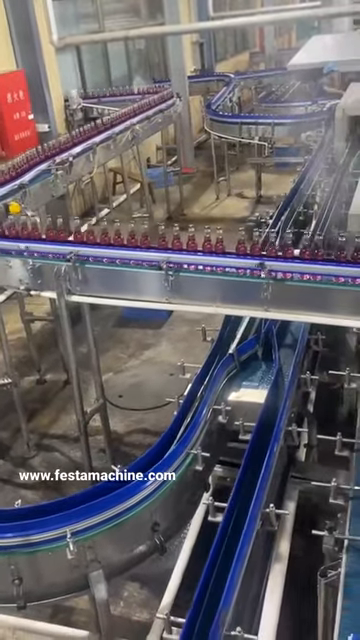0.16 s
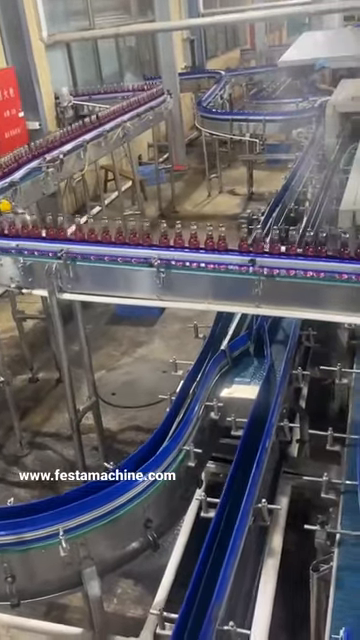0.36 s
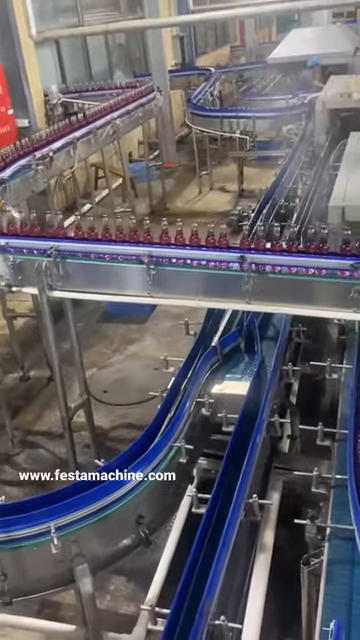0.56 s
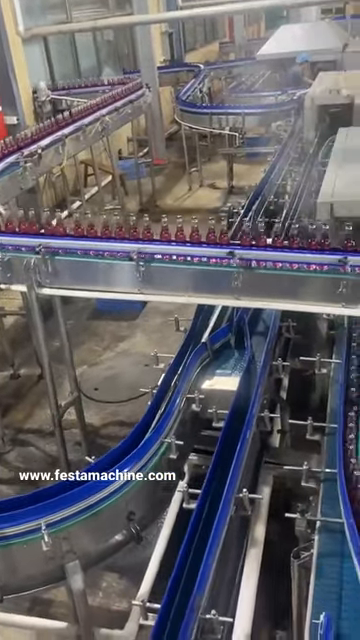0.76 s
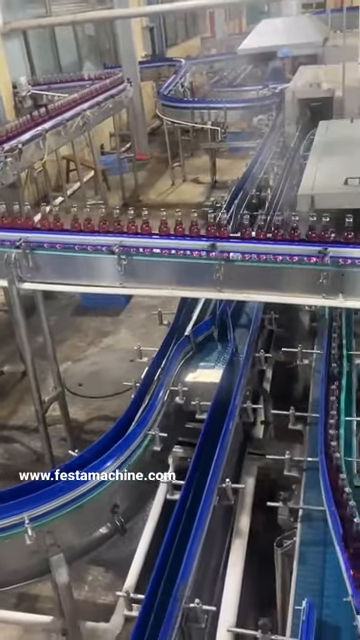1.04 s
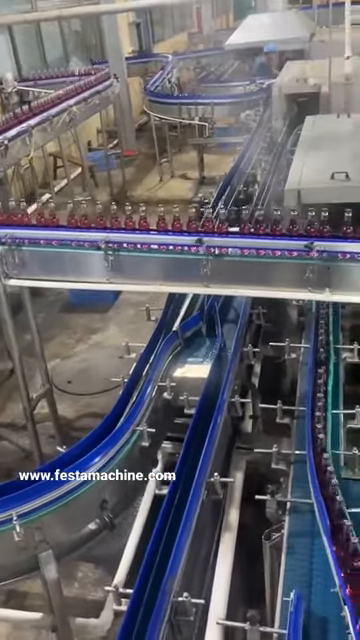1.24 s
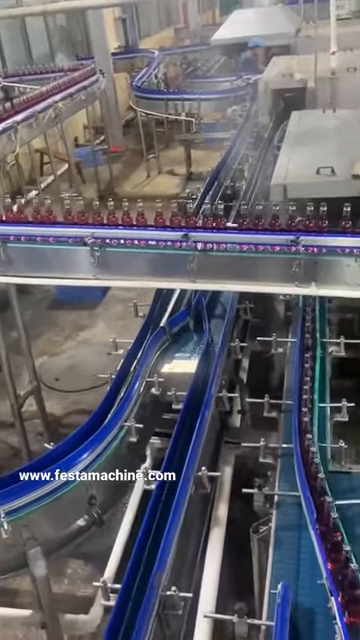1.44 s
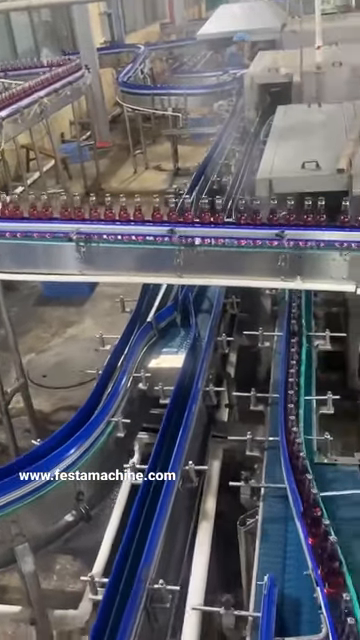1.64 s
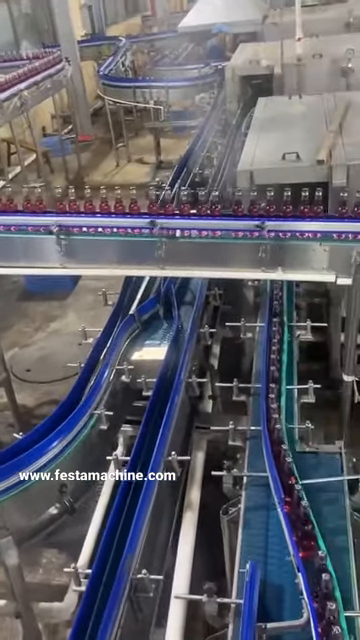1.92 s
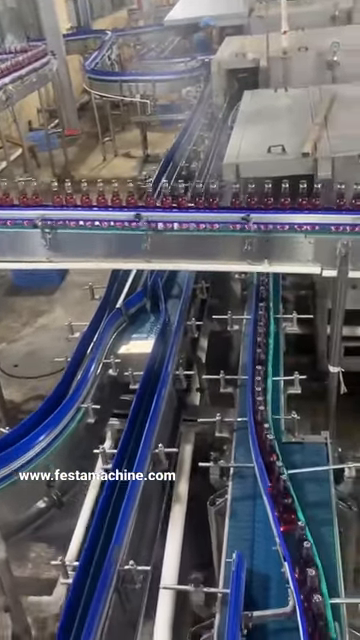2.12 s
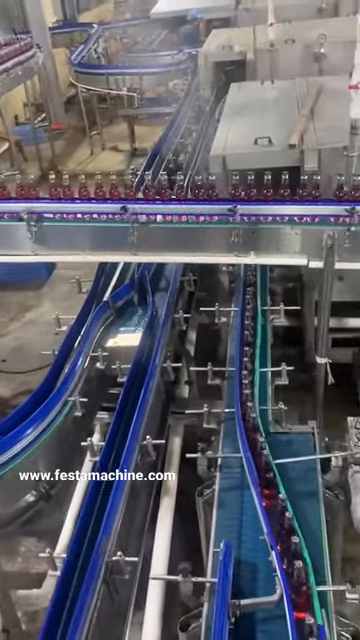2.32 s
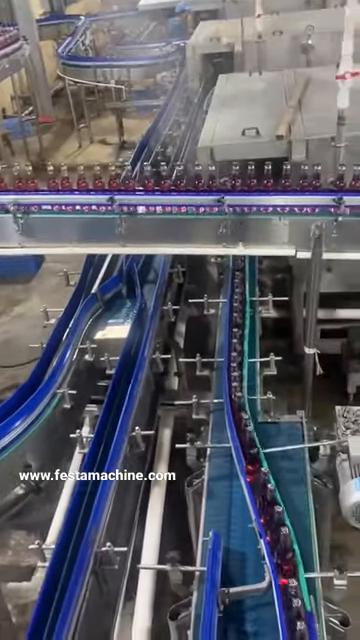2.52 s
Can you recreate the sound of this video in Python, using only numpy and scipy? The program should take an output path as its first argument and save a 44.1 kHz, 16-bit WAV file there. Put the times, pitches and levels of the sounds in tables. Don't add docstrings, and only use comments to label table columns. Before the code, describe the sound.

Crowded glass bottles clink and rattle without pause on conveyors, with sharper single knocks nearby. Behind them a broad machine roar, air hiss, low hums and thin whines fill a large reverberant factory hall, heard in stereo from a walkway.

```python
import sys
import numpy as np
from scipy import signal
from scipy.fft import rfft, irfft
from scipy.io import wavfile
from scipy.ndimage import uniform_filter1d

SR = 44100
rng = np.random.default_rng(int(sys.argv[2]) if len(sys.argv) > 2 else 0)


def store_wav(level_fs):
    pcm = np.round(np.clip(np.atleast_2d(level_fs), -1, 1) * 32767)
    wavfile.write(sys.argv[1], SR, pcm.T.astype(np.int16))


def undo_db(level):
    steps = np.asarray(level, float) / 20
    return 10 ** steps


N = 118188

# f/Hz, density/dB per Hz
ROAR_SPECTRUM = [(110, -3), (300, -7), (800, -7.5), (1300, -12.5), (4200, -23.5), (8000, -23), (11000, -27),
                 (15500, -28)]
# t/s, level/dB
AIR_HISS = [(0.0, -47), (0.05, -54.5), (0.46, -43), (0.48, -51), (1.22, -46.5), (1.24, -55), (1.42, -54),
            (1.43, -50), (1.69, -51), (1.78, -62), (2.1, -49.5), (2.18, -68), (2.21, -53), (2.28, -50),
            (2.31, -48), (2.68, -46)]
# f/Hz, width/Hz, level/dB, share of the fan throb/0-1
DRONE_HUMS = [
    (124.8, 18, -45.5, 0.37),
    (88.5, 31, -44, 0.27),
    (225.2, 12.4, -47, 0.08),
    (692, 21.4, -41.5, 0.03),
    (620.2, 120, -42, 0.03),
    (2887, 74, -44, 0),
]
# t/s, level/dB
FAN_THROB = [(0.0, -30.5), (0.66, -32), (0.67, -21), (1.56, -39), (1.59, -37), (1.72, -35), (1.76, -34),
             (2.14, -76), (2.17, -32.5), (2.52, -27), (2.64, -79), (2.68, -32)]
# f/Hz, start level/dB, end level/dB, left minus right/dB, left lead/rad
WHINE_TONES = [(839.8, -45, -43, -6, -1.8), (1892.7, -46, -47, 3, -.7), (2847.7, -49, -41, -4, .3),
               (2946.3, -36, -46, -7, 1.2), (2682, -53, -53, 0, 1), (2660, -54, -54, 0, .5),
               (2584, -56, -55, 0, .5), (3066.5, -52, -52, 0, .5), (3086, -51, -52, 0, .5),
               (3472.8, -53, -53, 0, .8), (1843.8, -54, -54, 0, 0), (1623.4, -55, -54, 0, -1),
               (2966, -53, -53, 0, .6), (3209, -52, -52, 0, .6)]
# t/s, peak level/dB, f/Hz
WALKWAY_THUMPS = [(0.177, -18.5, 139), (0.359, -17, 91.5), (0.449, -18, 135), (0.519, -23, 96.9),
                  (0.672, -22, 121), (0.76, -25, 135), (0.82, -23, 127), (0.89, -17.5, 135),
                  (0.95, -19, 141), (0.984, -17, 131), (1.054, -25, 126), (1.128, -25, 142),
                  (1.192, -40, 111), (1.325, -35, 99), (1.425, -20, 117), (1.583, -20, 124),
                  (1.771, -21, 107), (1.977, -36, 133), (2.174, -26, 106), (2.239, -19, 168),
                  (2.329, -20, 116), (2.5, -22.5, 157), (2.595, -24, 96)]
# f/Hz, spread between bottles/Hz, level/dB, t60/s
BOTTLE_MODES = [
    (2201, 30.3, -2.5, 0.081),
    (3330, 85, 2, 0.063),
    (4410, 210, -2.5, 0.065),
    (6030, 140, -10, 0.059),
    (6630, 140, -10.5, 0.072),
    (3130, 55, -15.5, 0.16),
    (2580, 95, -16.5, 0.08),
    (8020, 390, -8, 0.099),
    (12200, 310, -11.5, 0.044),
]
# t/s, shoulder contacts level/dB, base contacts level/dB
CROWDING = [(0.0, -26, -66), (0.03, -28.5, -37.5), (0.22, -52, -34.5), (0.25, -24.5, -38),
            (0.27, -40, -34.5), (0.42, -26, -32.5), (0.59, -44.5, -37.5), (0.76, -24.5, -37),
            (0.78, -34.5, -35), (0.96, -34, -45), (1.01, -29.5, -33.5), (1.22, -34.5, -40.5),
            (1.66, -30, -30), (1.8, -31.5, -35), (1.91, -35, -42), (1.95, -34, -35.5), (2.66, -31.5, -34),
            (2.68, -41, -42)]
# t/s, peak level/dB, f/Hz
NEAR_WALL_KNOCKS = [(0.0447, -21, 3310), (0.1205, -33, 3360), (0.2256, -26, 3250), (0.2457, -14, 3346),
                    (0.4802, -26, 3270), (0.5059, -25, 3390), (0.5446, -22, 3260), (0.644, -23, 3400),
                    (0.6638, -16.5, 3320), (0.7132, -23, 3340), (0.907, -28, 3290), (0.997, -24, 3330),
                    (1.02, -22, 3270), (1.0546, -31, 3310), (1.0848, -21, 3260), (1.1356, -27, 3360),
                    (1.4425, -28, 3330), (1.5558, -22, 3360), (1.6434, -19, 3320), (1.6972, -31, 3300),
                    (1.7643, -26, 3250), (1.9265, -27, 3330), (1.9793, -25, 3310), (2.2736, -23, 3320),
                    (2.2912, -19, 3320), (2.3064, -28, 3330), (2.355, -31, 3290), (2.44, -32, 3310),
                    (2.612, -22.5, 3400), (2.6678, -16.5, 3330)]
# t/s, peak level/dB, f/Hz
NEAR_BODY_KNOCKS = [(0.1655, -33, 2200), (0.2733, -24, 2200), (0.387, -43, 2120), (0.4105, -36, 2190),
                    (0.5442, -32, 2180), (0.6275, -28, 2270), (0.7786, -23, 2178), (1.0126, -38, 2250),
                    (1.1388, -30, 2200), (1.2007, -24.5, 2135), (1.2386, -26, 2150), (1.4232, -39, 2210),
                    (1.4606, -20, 2207), (1.5524, -29, 2230), (1.6038, -17.5, 2195), (1.6472, -26, 2230),
                    (1.6801, -30, 2230), (1.7609, -19.5, 2246), (1.7843, -21, 2265), (1.923, -35, 2160),
                    (1.943, -24, 2200), (1.9604, -20.5, 2200), (1.9834, -26, 2160), (2.0792, -24, 2110),
                    (2.1006, -19, 2206), (2.2129, -29, 2290), (2.2228, -26, 2230), (2.2942, -43, 2130),
                    (2.4244, -21, 2213), (2.6623, -28, 2200)]
# t/s, peak level/dB, f/Hz
NEAR_NECK_KNOCKS = [(0.1361, -33, 4500), (0.2553, -26, 4480), (0.2877, -29, 4350), (0.3426, -35, 4340),
                    (0.398, -28, 4440), (0.4417, -26, 4520), (0.6544, -31, 4500), (0.718, -26, 4410),
                    (0.7562, -28, 4400), (0.854, -33, 4510), (0.9318, -33, 4220), (0.9971, -31, 4420),
                    (1.0286, -28, 4500), (1.5604, -29, 4390), (1.7454, -27, 4540), (1.7953, -30, 4550),
                    (1.8252, -29, 4560), (1.9629, -28, 4580), (1.9934, -26, 4530), (2.0692, -27, 4550),
                    (2.2139, -31, 4400), (2.2722, -26, 4420), (2.3272, -25, 4480), (2.376, -27, 4550),
                    (2.4618, -24, 4400), (2.6614, -31, 4340)]
# f/Hz, likeness/0-1
PORT_LIKENESS = [(150, .999), (400, 1), (800, 0.51), (1250, 0.11), (1800, 0.59), (4000, 0.52), (5000, 0.73),
                 (15000, 1)]
# f/Hz, lead/rad
PORT_LEAD = [(0, 0), (1200, -1.5), (2600, 1.2), (5100, .3), (7420, 3.14), (10600, 6.28), (13550, 9.42),
             (15600, 11.9)]
# f/Hz, left minus right/dB
PORT_TILT = [(60, 0.0), (180, -0.11), (550, -1.2), (1650, -0.95), (4960, -1.5), (15000, 0.89)]

TIME = np.arange(N) / SR
FIRST_FIELD = np.array([[1], [0]])


def evened(x):
    return x / np.sqrt(np.mean(x ** 2) + 1e-20)


def read(points, hz, scale=np.log1p):
    f, value = np.transpose(points)
    return np.interp(scale(hz), scale(f), value)


def level_at(s, t, db):
    return np.interp(s, t, db - db.mean())


def drift(per_s, length):
    t = np.linspace(0, N / SR, length)
    rates = np.geomspace(per_s / 10, per_s, num=16)
    parts = sum(np.sin(2 * np.pi * (f * t + rng.random())) / np.sqrt(f) for f in rates)
    return evened(parts - parts.mean())


def ring(hz, db, t60, rise_s):
    t = np.arange(SR // 7) / SR
    return undo_db(db - 60 * t / t60) * (1 - np.exp(-t / rise_s)) * np.sin(2 * np.pi * hz * t)


def roar():
    hop, size = 256, 1024
    frames, hz = N // hop + 5, np.fft.rfftfreq(size, 1 / SR)
    a, b, c, d, patches = rng.standard_normal((frames, len(hz), 5)).T
    patches = uniform_filter1d(patches, size=12, axis=0)
    patches = evened(uniform_filter1d(patches, size=12, axis=1))
    high = np.clip(hz / 8000, 0, 1)[:, None]
    bass = np.clip(1 - hz / 300, 0, 1)[:, None]
    airy = np.minimum(hz / 14000, 1)[:, None] ** 4

    field_db = read(ROAR_SPECTRUM, hz)[:, None] + 0.84 * patches
    field_db = field_db + 0.6 * drift(3.57, frames)
    field_db = field_db + 0.8 * high * drift(40.1, frames)
    air_db = level_at(np.arange(frames) * hop / SR, *np.transpose(AIR_HISS))
    field_db = field_db + 0.57 * airy * air_db
    turned_db = -1 * high ** 2 / 2 - 6 * bass
    field_db = field_db + turned_db * np.linspace(-.5, .5, frames)

    z = np.array([a + 1j * b, c + 1j * d]) * undo_db(field_db)
    noise = signal.istft(z, nperseg=size, noverlap=size - hop)[1][:, :N]
    return undo_db(-26) * evened(noise)


def drone():
    out = np.zeros((2, N))
    throb_db = level_at(TIME, *np.transpose(FAN_THROB))
    for hz, width_hz, db, share in DRONE_HUMS:
        r = np.exp(-np.pi * width_hz / SR)
        noise = rng.standard_normal((2, N)) + 1j * rng.standard_normal((2, N))
        slow = signal.lfilter([1], [1, -2 * r, r * r], noise)
        hum = (slow * np.exp(2j * np.pi * hz * TIME)).real
        out += undo_db(db + share * throb_db) * evened(hum)
    return out


def whines():
    wobble_db, wobble_per_s, wander_hz = 2.5, 6, 1.75
    out, places = np.zeros((2, N)), np.linspace(0, N, 256)
    for hz, start_db, end_db, pan_db, lead in WHINE_TONES:
        *wobbles, wander = [np.interp(np.arange(N), places, drift(wobble_per_s, 256)) for _ in range(3)]
        phase = 2 * np.pi * np.cumsum(hz + wander_hz * wander) / SR
        for ch, side in enumerate((.5, -.5)):
            level_db = np.linspace(start_db, end_db, N) + side * pan_db + wobble_db * wobbles[ch]
            out[ch] += np.sqrt(2) * undo_db(level_db) * np.sin(phase + side * lead)
    return out


def thumps():
    out = np.zeros((2, N + SR))
    for s, db, hz in WALKWAY_THUMPS:
        sound = ring(hz, db - 1, t60=0.19, rise_s=0.0082)
        out[0, round(s * SR):][:len(sound)] += sound * np.linspace(1, 0, len(sound))
    return out[:, :N]


def clinks():
    bottles, clinks_per_s = 48, 1100
    struck = rng.random(N) < clinks_per_s / SR
    size = undo_db(1.5 * np.minimum(rng.exponential(1, N), 5)) * struck
    which, out = rng.integers(0, bottles, N), np.zeros((2, N))
    spread = np.tile(np.linspace(-1, 1, num=bottles // 2), (2, len(BOTTLE_MODES), 1))
    detune = rng.permuted(spread, axis=2)
    for k in range(bottles):
        kind = k % 2
        strike_db = 2 * rng.standard_normal(len(BOTTLE_MODES))
        modes = [ring(hz + spread_hz * u, db + v, t60, 0.001)
                 for (hz, spread_hz, db, t60), u, v in zip(BOTTLE_MODES, detune[kind, :, k // 2], strike_db)]
        t = np.arange(len(modes[0])) / SR
        tick = undo_db(-11 - 60 * t / 0.0046) * rng.standard_normal(len(t))
        low, upper = undo_db(-11 * np.array([1 - kind, kind]))
        bottle = low * modes[0] + upper * sum(modes[1:]) + tick
        out[kind] += signal.oaconvolve(size * (which == k), bottle)[:N]
    out = undo_db(-32.5) * out / np.std(out.sum(0))
    s, *crowd_db = np.transpose(CROWDING)
    return sum(undo_db(level_at(TIME, s, db)) * part for db, part in zip(crowd_db, out))


def knocks():
    out, rise_s = np.zeros(N + SR), 0.002
    # knocks, t60 in s, upper mode over struck mode
    kinds = ((NEAR_WALL_KNOCKS, 0.077, 4450 / 3330),
             (NEAR_BODY_KNOCKS, 0.092, 3330 / 2200),
             (NEAR_NECK_KNOCKS, 0.065, 6000 / 4450))
    for table, t60, upper in kinds:
        for s, db, hz in table:
            sound = ring(hz, db, t60, rise_s) + ring(hz * upper, db - 15, t60 / 2, rise_s)
            out[round(s * SR):][:len(sound)] += undo_db(1.5) * sound
    return out[:N]


def hall(x):
    t60, echo_db, turns_per_s, gap = 0.54, -7, 1.507, 20
    taps, slots = np.zeros((3, 2, SR)), np.arange(100, SR - gap, gap)
    at = slots + rng.integers(0, gap, (3, 2, len(slots)))
    np.put_along_axis(taps, at, rng.choice([-1., 1.], at.shape), 2)
    taps *= undo_db(-60 * np.arange(SR) / SR / t60)
    taps *= undo_db([[echo_db], [0]]) / np.linalg.norm(taps[0, 0])
    turns = turns_per_s * TIME + np.arange(3)[:, None] / 3
    share = np.sqrt(2 / 3) * np.cos(np.pi * turns)
    echoes = signal.fftconvolve((x * share)[:, None], taps, axes=2)[..., :N].sum(0)
    return echoes + x * FIRST_FIELD


def ports(fields):
    hz = np.fft.rfftfreq(N, 1 / SR)
    a, b = rfft(fields, axis=1)
    same = np.clip(read(PORT_LIKENESS, hz), 0, 1)
    tilt = undo_db(read(PORT_TILT, hz) / 2)
    half_lead = np.exp(.5j * read(PORT_LEAD, hz, np.asarray))
    left = a * half_lead * tilt
    right = (same * a / half_lead + np.sqrt(1 - same ** 2) * b) / tilt
    return irfft(np.array([left, right]), N, axis=1)


def scene():
    near, wet = knocks(), undo_db(-5)
    direct = (1 - wet) * near * FIRST_FIELD
    fields = roar() + drone() + thumps() + direct + hall(clinks() + wet * near)
    return ports(fields) + whines()


def band_limit(x):
    return signal.sosfilt(signal.butter(12, 15560, fs=SR, output="sos"), x)


def record(dry):
    bass_cut = signal.butter(3, 69.6, "highpass", fs=SR, output="sos")
    return band_limit(signal.sosfilt(bass_cut, dry))


dry = scene()
out = record(dry)
store_wav(out)
```